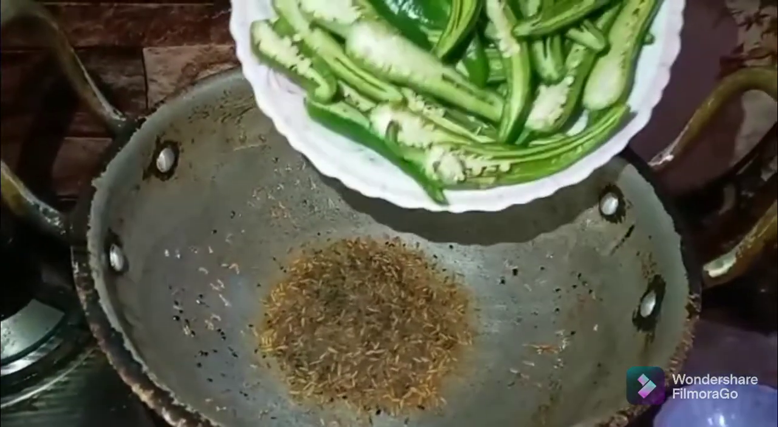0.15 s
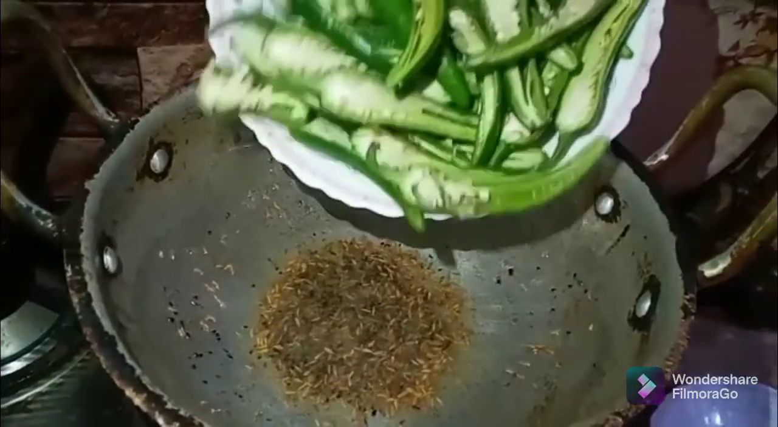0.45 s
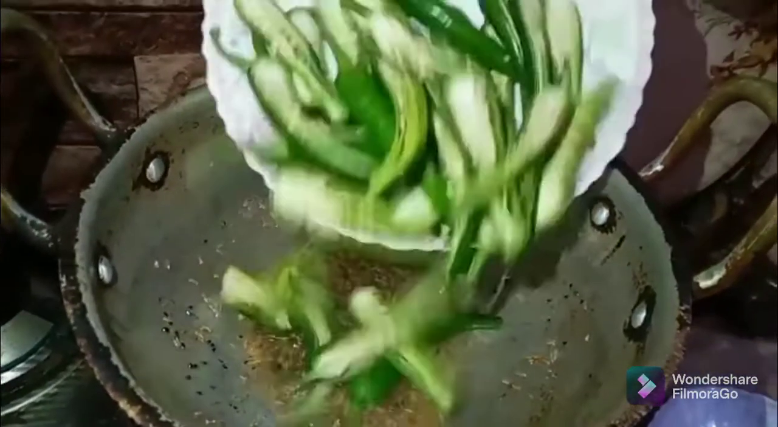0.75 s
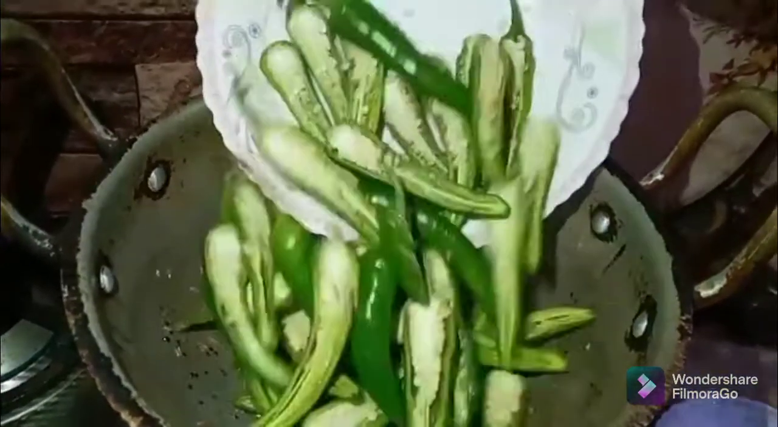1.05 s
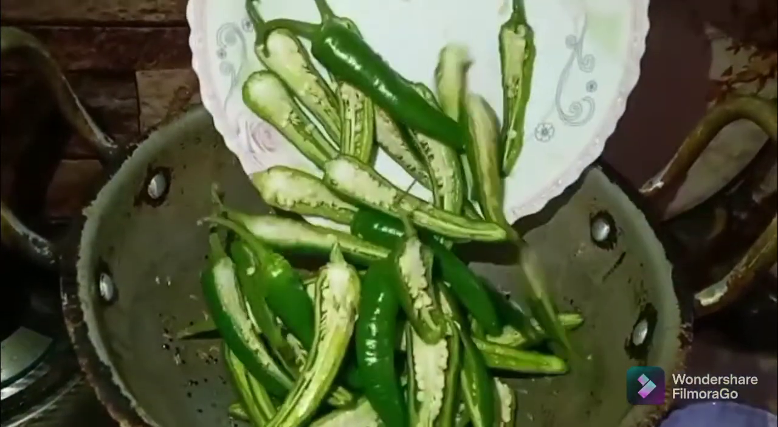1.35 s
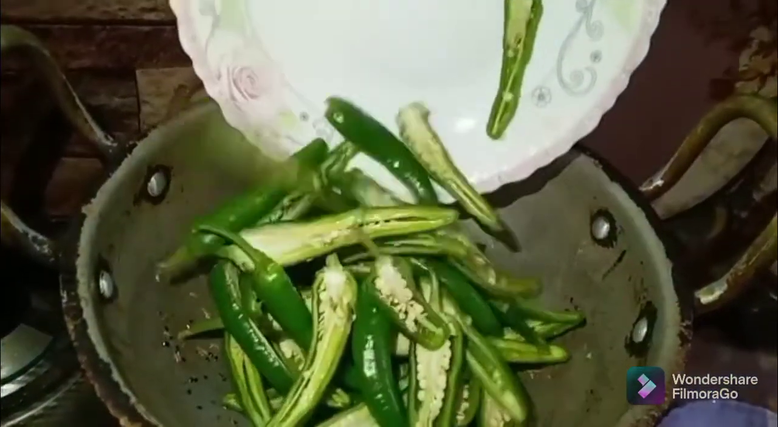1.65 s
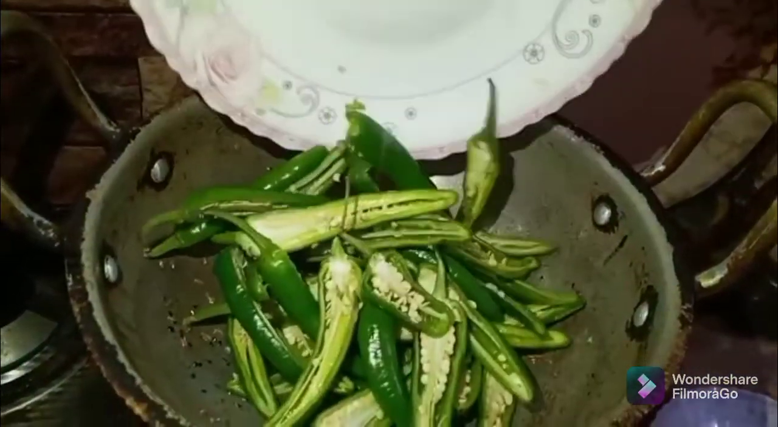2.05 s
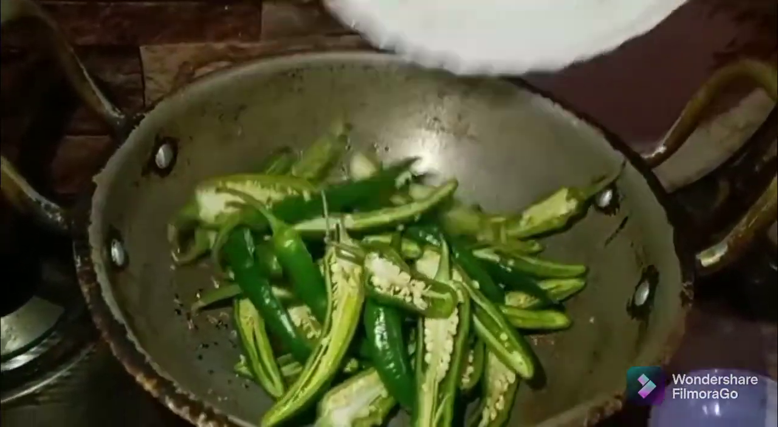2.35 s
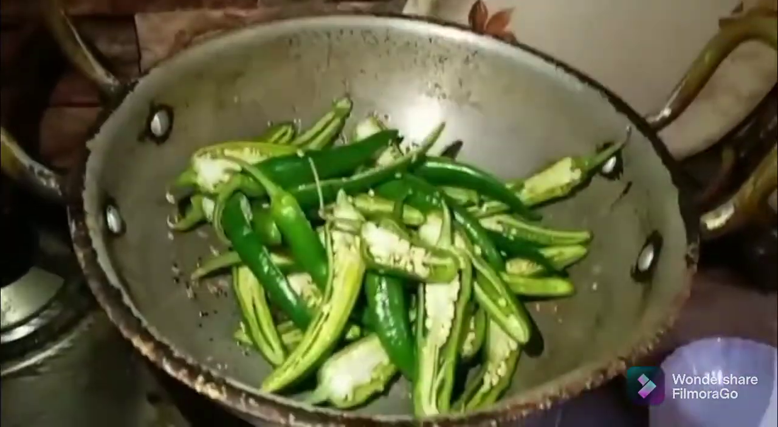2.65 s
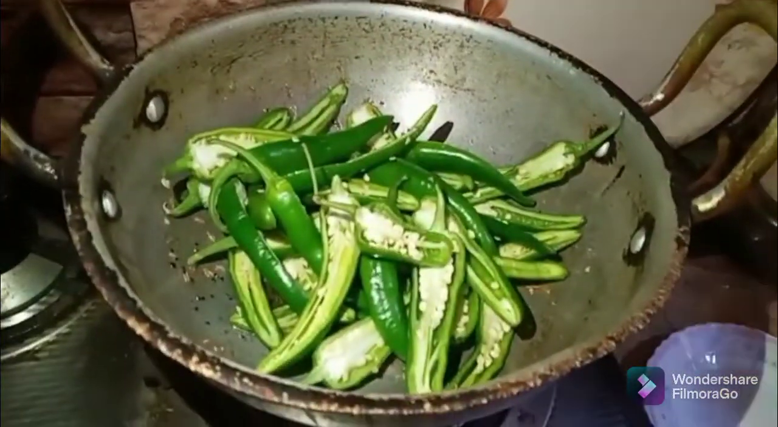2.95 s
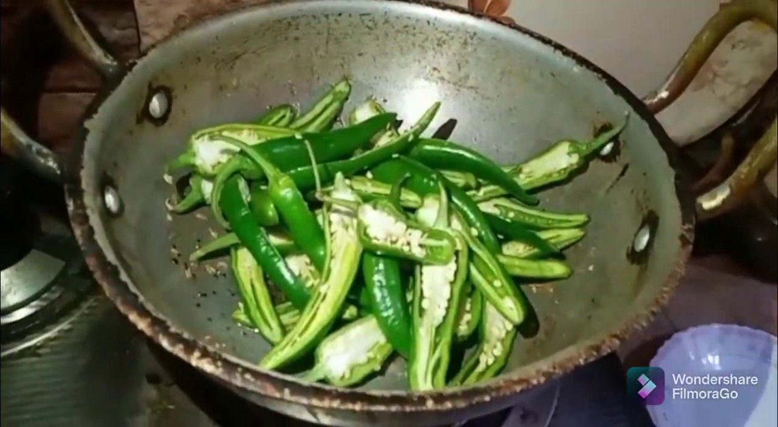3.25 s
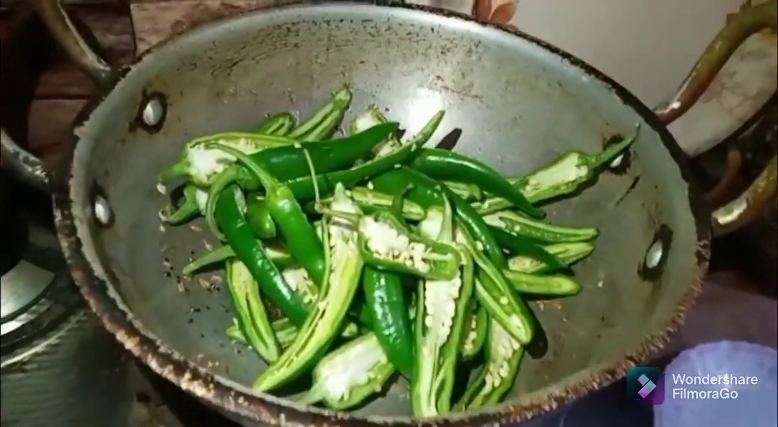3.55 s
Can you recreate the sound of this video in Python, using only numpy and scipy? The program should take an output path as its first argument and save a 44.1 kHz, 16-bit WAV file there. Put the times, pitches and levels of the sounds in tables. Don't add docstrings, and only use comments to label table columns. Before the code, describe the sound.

Frying sizzle bursts up as wet chillies hit hot oil, with sharp pops and a late dish rattle.

```python
import sys
import numpy as np
from scipy import signal
from scipy.fft import rfft, irfft
from scipy.io import wavfile

SR = 44100
rng = np.random.default_rng(int(sys.argv[2]) if len(sys.argv) > 2 else 0)


def store_wav(level_fs):
    pcm = np.round(np.clip(np.atleast_2d(level_fs), -1, 1) * 32767)
    wavfile.write(sys.argv[1], SR, pcm.T.astype(np.int16))


def boost_factor(decibels):
    exponent = np.asarray(decibels, float) / 20
    return 10 ** exponent


N = 163170
LAG_S, LAG_SPREAD_S = 0.0010425, 0.0003


def rms_one(x):
    return x / np.sqrt(np.mean(x ** 2) + 1e-20)


def drift(rate_hz):
    r = np.exp(-16 * np.pi * rate_hz / SR)
    noise = rng.standard_normal(N // 8 + 4002)
    slow = signal.lfilter([1], [1, -2 * r, r * r], noise)[4000:]
    return np.interp(np.arange(N) / 8, np.arange(len(slow)), rms_one(slow))


def colour(x, points):
    hz, db = np.transpose(points)
    size = 4096
    bins_hz = np.arange(size // 2 + 1) * SR / size
    log_gain = np.interp(np.log(bins_hz + 1), np.log(hz), db) * np.log(10) / 20
    cepstrum = irfft(log_gain)
    cepstrum[1:size // 2] *= 2
    cepstrum[size // 2 + 1:] = 0
    impulse = irfft(np.exp(rfft(cepstrum)))[:size // 2]
    return signal.oaconvolve(x, impulse)[:N]


def bandpass(x, order, band_hz):
    return signal.sosfilt(signal.butter(order, band_hz, "band", fs=SR, output="sos"), x)


def thin(x):
    return signal.sosfilt(signal.butter(4, 760, "high", fs=SR, output="sos"), x)


def ring(clicks, hz, t60_s):
    r, w = boost_factor(-60 / (t60_s * SR)), 2 * np.pi * hz / SR
    return signal.lfilter([0, np.sin(w)], [1, -2 * r * np.cos(w), r * r], clicks + 1e-18)


def pan(db):
    return boost_factor([[db / 2], [-db / 2]])


def add(out, start_s, wave, pan_db, lag_s):
    wave = wave * np.ones((2, 1)) * pan(pan_db)
    for side, late_s in enumerate((lag_s, 0)):
        i = int((start_s + late_s) * SR)
        out[side, i:i + wave.shape[1]] += wave[side][:max(N - i, 0)]


# frequency in Hz, gain in dB.
LEFT_MIC = [(550, -29.5), (860, -11.5), (1600, -10), (2500, -2.5), (4800, -2.5), (6500, 3.5), (8800, -12),
            (13000, -25.5), (15200, -9)]
RIGHT_MIC = [(550, -28.5), (860, -7), (1100, -16.5), (2400, -6.5), (6800, -7.5), (8000, -20.5), (11300, -7),
             (13600, -16), (15000, -10)]


def microphones(x):
    return np.array([colour(x[0], LEFT_MIC), colour(x[1], RIGHT_MIC)])


def wok(x):
    echo_db, t60_s = -5, 0.02
    t = np.arange(int(.06 * SR)) / SR
    tail = rng.standard_normal((2, len(t))) * boost_factor(-60 * t / t60_s) * (t > .0006)
    tail *= boost_factor(echo_db) / np.sqrt(np.sum(tail ** 2, axis=1, keepdims=True))
    return x + signal.oaconvolve(x, tail, axes=1)[:, :N]


LOW_PAN_DB = 3.5
LOW_ROOM_HZ, HIGH_ROOM_HZ = 92.9, 138.4
# start in seconds, length in seconds, level in dB.
THUDS_LOW = [(0.175, 0.051, -44.5), (.72, .09, -56.5), (1.501, 0.086, -52), (1.64, 0.057, -55),
             (2.011, 0.055, -54.5), (2.64, 0.051, -55), (3.24, 0.056, -49.5), (0.388, 0.078, -41.5),
             (0.504, 0.082, -43.5), (0.964, 0.022, -46), (1.108, 0.034, -49), (1.384, 0.033, -47),
             (3.362, 0.04, -46), (3.469, 0.045, -45)]
THUDS_HIGH = [(0.009, 0.025, -45.5), (0.105, 0.038, -47.5), (1.113, 0.11, -46), (1.336, 0.073, -46),
              (2.02, 0.067, -55), (2.75, .06, -54), (2.94, 0.068, -54), (2.301, 0.057, -48),
              (2.442, 0.073, -48), (3.496, 0.07, -46)]
# start in seconds, length in seconds, level
# in dB, frequency in Hz.
PLATE_TAPS = [(.768, 0.0034, -41.5, 371), (0.795, 0.012, -40, 400), (3.26, .02, -51, 262),
              (3.47, 0.017, -49.5, 262), (1.05, 0.11, -46, 68.2)]


def thuds():
    out = np.zeros((2, N))
    rows = [(*row, LOW_ROOM_HZ) for row in THUDS_LOW]
    rows += [(*row, HIGH_ROOM_HZ) for row in THUDS_HIGH]
    for start_s, length_s, db, hz in rows + PLATE_TAPS:
        t = np.arange(int((1.18 * length_s + 0.025) * SR)) / SR
        swell = abs(np.sin(np.pi * t / t[-1])) ** 0.92
        wobble = 0.57 * np.sin(50 * t + 99 * start_s)
        wave = np.sin(2 * np.pi * hz * t + wobble) * swell
        add(out, max(start_s - .02, 0), boost_factor(db + 2) * wave, LOW_PAN_DB, LAG_S)
    return out


# frequency in Hz, gain in dB.
AIR = [(30, -19), (65, -9), (93, 3), (140, -5), (240, -17.5), (370, -12), (520, -25.5), (1500, -24)]
# frequency in Hz, width in Hz, level in dB.
WHISTLES = [(4030, 93, -86), (5400, 170, -69), (6600, 400, -67), (6570, 2900, -58.5), (11700, 4700, -64.5)]
AIR_DB = -56.5
FLARE_S, FLARE_WIDTH_S, FLARE_DB = 0.243, 0.014, 8.3


def air_and_gas():
    t = np.arange(N) / SR
    shared, own = rng.standard_normal(N + 99), rng.standard_normal((2, N))
    air = []
    for late, noise in zip((int(LAG_S * SR), 0), own):
        air.append(colour(shared[99 - late:][:N] + 0.57 * noise, AIR + [(9000, -37)]))
    air = rms_one(np.array(air)) * boost_factor(AIR_DB - 2.5 + 2.4 * drift(9.2) + 6.9 * np.exp(-t))
    gas = 0
    for hz, width_hz, db in WHISTLES:
        t60_s = 2.9 / width_hz
        gas = gas + boost_factor(db) * rms_one(ring(ring(own, hz, t60_s), hz, t60_s))
    flare_db = FLARE_DB * np.exp(-((t - FLARE_S) / FLARE_WIDTH_S) ** 2)
    gas = gas * boost_factor(1.6 * drift(8) + flare_db) * [[2], [.5]]
    return (air + gas) * pan(LOW_PAN_DB)


# time in seconds, peak in dB.
KNOCKS = [(3.219, -8), (3.267, -16.5), (3.292, -11), (3.321, -16), (3.416, -6.5), (3.477, -21),
          (3.504, -21)]
# frequency in Hz, level in dB, t60 in seconds.
RIM_A = [(1270, -6, 0.038), (1531, -5, 0.045), (1850, -11, 0.049), (2300, -10, 0.049), (2344, -11, 0.08),
         (4052, -5, 0.058), (6595, -2, .1), (7700, -15, .04)]
RIM_B = [(1330, -11.5, .035), (2420, 1, 0.087), (4157, -13, 0.04), (6840, -13, 0.046), (7680, -10, 0.04)]
# frequency in Hz, gain in dB.
DRAG_COLOUR = [(152, -9), (265, -9), (422, -4), (902, 5), (1302, 11), (1800, 11), (2300, 7), (3502, -16.5)]
DRAG_START_S, DRAG_END_S, DRAG_FADE_S, DRAG_DB = 3.214, 3.62, 0.015, -28.5
TIP_S = 3.37
CONTACT_S, SING_DB = 0.0021, -55.5
DISH_PAN_DB, DISH_LAG_S = 8.5, 0.0005


def dish():
    out, t = np.zeros((2, N)), np.arange(N) / SR
    knock_s, knock_db = np.transpose(KNOCKS)
    fade = np.clip(np.minimum(t - DRAG_START_S, DRAG_END_S - t) / DRAG_FADE_S, 0, 1)
    grit = rng.standard_normal((2, N)) * boost_factor(2.63 * drift(35)) * fade
    grit *= boost_factor(-11 * np.abs(t - DRAG_START_S))
    contact = rng.standard_normal(400) * np.exp(-t[:400] / CONTACT_S)
    share_b = np.where(t < TIP_S, .1, .9)
    for rim, weight in ((RIM_A, 1 - share_b), (RIM_B, share_b)):
        for hz, level_db, t60_s in rim:
            clicks = np.zeros((2, N))
            for side, late_s in enumerate((DISH_LAG_S, 0)):
                at = ((knock_s + late_s) * SR).astype(int)
                clicks[side, at] = boost_factor(knock_db - 6.0 + rng.normal(0, 2.2, len(at)))
            gain_at_mode = abs(np.sum(contact * np.exp(2j * np.pi * hz * t[:400])))
            push = signal.lfilter(contact / gain_at_mode, 1, clicks)
            out += ring(weight * boost_factor(level_db) * (push + boost_factor(SING_DB) * grit[0]), hz, t60_s)
    drag = rms_one(np.array([colour(g, DRAG_COLOUR) for g in grit]))
    return (wok(thin(out)) + boost_factor(DRAG_DB - 13) * drag) * pan(DISH_PAN_DB)


SPARK_DB, CRACK_DB, CRACK_T60_S = 5.5, 0.5, 0.022
# time in seconds, peak in dB.
CRACKS = [(0.5055, -25.5), (0.643, -19.5), (0.6717, -26), (0.7673, -21), (0.9616, -27), (1.0079, -21.5),
          (1.0528, -22), (1.2784, -22), (2.6622, -23.5), (2.702, -23), (3.3468, -19.5)]


def cracks():
    out, t = np.zeros((2, N)), np.arange(int(.06 * SR)) / SR
    front = 1 + 4.2 * (t < .0002)
    for start_s, db in CRACKS:
        noise = np.diff(rng.standard_normal((2, len(t))), prepend=0) * 0.63
        fall = boost_factor(db + CRACK_DB - 60 * t / CRACK_T60_S)
        add(out, start_s, fall * noise * front, 0, LAG_S)
    return microphones(out) * boost_factor(SPARK_DB)


# time in seconds, peak in dB, pitch in Hz.
BUBBLE_POPS = [(0.643, -23.5, 6300), (0.71, -11.5, 4030), (0.766, -13.5, 6900), (0.825, -13.5, 2140),
               (1.042, -23, 5640), (1.053, -15.5, 5440), (1.116, -15, 6000), (1.193, -11, 5630),
               (1.24, -7.5, 2080), (1.312, -19, 6600), (1.33, -12, 6600), (1.387, -14.5, 6500),
               (1.425, -11, 6400), (1.455, -11, 6260), (1.503, -22, 5450), (1.517, -10, 5240),
               (1.598, -9, 6300), (1.645, -11.5, 6070), (1.668, -11, 6000), (1.703, -10.5, 5650),
               (1.743, -15.5, 3560), (1.799, -15, 3650),
               (0.416, -26, 6600), (0.472, -22, 6300), (1.084, -12, 2320), (1.576, -16, 1200),
             (1.963, -11.5, 3900), (1.999, -10, 3550), (2.043, -10, 5590), (2.077, -12, 2600),
             (2.148, -12, 3800), (2.241, -11.5, 3580), (2.276, -12.5, 5930), (2.416, -11, 4660),
             (2.457, -9, 2450), (2.506, -10, 4400), (2.556, -13.5, 6840), (2.594, -16, 3400),
             (2.737, -13, 3130), (2.863, -8.5, 5800), (3.347, -18, 6640), (3.507, -11.5, 6500),
             (3.53, -9, 3420), (3.64, -9.5, 2570), (1.587, -13, 2400), (1.128, -15, 3600),
             (1.255, -13, 2170), (1.346, -18, 1500), (1.388, -15, 2600), (1.537, -18, 1500),
               (0.5338, -17.5, 5370), (0.611, -18, 6730), (0.7883, -16.5, 6600), (0.8996, -19, 6950),
              (0.945, -22, 2900), (1.0724, -17.5, 2360), (1.1665, -14.5, 6270), (1.3464, -20.5, 6550),
              (1.5364, -19, 6440), (1.7544, -15, 3780), (1.7674, -15.5, 5850), (1.8317, -17, 6380),
              (1.8427, -16, 5800), (1.9044, -20, 6680), (1.9455, -14, 6140), (1.9774, -14, 6210),
              (2.069, -13.5, 2580), (2.1031, -15.5, 3760), (2.1594, -14.5, 4190), (2.1824, -17, 2530),
              (2.2164, -13, 6480), (2.3147, -14.5, 6280), (2.3466, -16, 6700), (2.3595, -14.5, 4300),
              (2.39, -14, 6110), (2.6633, -15, 5400), (2.6764, -18.5, 6700), (2.7058, -17.5, 6380),
              (2.798, -13.5, 5170), (2.8446, -13.5, 4200), (2.8774, -14.5, 6720), (2.8887, -15, 3600),
              (2.907, -14, 6600), (3.025, -16.5, 6190), (3.0485, -11.5, 6760), (3.0829, -18, 3230),
              (3.0983, -13, 4120), (3.126, -16, 3050), (3.1787, -14.5, 6370), (3.1984, -9, 6460),
              (3.5444, -10.5, 4360), (3.5745, -13.5, 5680), (3.625, -13.5, 2770)]
POPS = BUBBLE_POPS
POP_DB, POP_CYCLES, POP_PAN_DB = -1, 26, 5.5
SECOND_DB, SECOND_S = -7, 0.0042
PUFF_DB, PUFF_T60_S = -17, 0.04


def pops():
    out, sparks = np.zeros((2, N)), np.zeros((2, N))
    t = np.arange(int(.06 * SR)) / SR
    for start_s, db, hz in POPS:
        a, b, c = rng.standard_normal(3)
        noise = rng.standard_normal((2, len(t)))
        turns = hz * t
        t60_cycles = POP_CYCLES * (hz / 6000) ** 0.97 * boost_factor(1.5 * a)
        wave = np.sin(2 * np.pi * turns * (1 + 0.0011 * turns))
        wave *= (1 - np.exp(-turns)) * boost_factor(-60 * turns / t60_cycles)
        wave *= boost_factor(db + POP_DB - 4.0 * (hz < 3000)) / abs(wave).max()
        add(out, start_s, wave, POP_PAN_DB, LAG_S + LAG_SPREAD_S * b)
        second_s = start_s + SECOND_S * boost_factor(2.6 * c)
        add(out, second_s, boost_factor(SECOND_DB) * wave, POP_PAN_DB, LAG_S - LAG_SPREAD_S * b)
        puff = rms_one(bandpass(noise, 3, [hz / 1.59, hz * 0.99 + 1200]))
        add(out, start_s, puff * boost_factor(db + PUFF_DB - 60 * t / PUFF_T60_S), POP_PAN_DB, LAG_S)
        spark = boost_factor(db + PUFF_DB - 60 * t / CRACK_T60_S) * noise * 0.82
        add(sparks, start_s, spark, 0, LAG_S)
    return thin(out) + microphones(sparks) * boost_factor(SPARK_DB)


WOK_HZ, WOK_RING_T60_S, WOK_RING_DB, THUMP_DB = 874, 0.064, -36, -6
# time in seconds, peak in dB.
THUMPS = [(0.475, -34.5), (0.825, -38), (1.084, -37), (1.136, -30), (1.537, -32), (1.577, -23),
          (1.869, -36), (1.904, -33), (1.956, -32), (2.443, -31.5), (2.806, -29), (2.979, -31.5),
          (3.007, -29.5)]


def bowl():
    clicks = np.zeros((2, N))
    for start_s, db, hz in POPS:
        add(clicks, start_s, boost_factor(db + WOK_RING_DB - 9.5 * np.log2(hz / 3000)) * np.ones(1), 0, LAG_S)
    for start_s, db in THUMPS:
        add(clicks, start_s, boost_factor(db + THUMP_DB) * np.ones(1), 0, LAG_S)
    return ring(clicks, WOK_HZ, WOK_RING_T60_S)


def scatter(per_s, spread_db):
    at = np.flatnonzero(rng.random(N) < per_s / SR)
    size, sign, place, lag, pitch = rng.random((5, len(at)))
    height = boost_factor(spread_db * np.minimum(-np.log(size + 1e-9), 2.4)) * np.sign(sign - .5)
    lag_s = LAG_S + LAG_SPREAD_S * (4 * lag - 2)
    late = np.clip(at + (lag_s * SR).astype(int), 0, N - 1)
    return (late, at), height * boost_factor(np.outer([1, -1], 8 * (place - .5))), pitch


FIZZ_DB, FIZZ_PATCHY_DB = -3.5, 3


def fizz(flurry, wet_db):
    edges_hz = np.geomspace(400, 17000, 14)
    white, out = rng.standard_normal((2, 2, N)), 0
    for k, (low_hz, high_hz) in enumerate(zip(edges_hz, edges_hz[1:])):
        gain_db = FIZZ_PATCHY_DB * (0.27 * flurry + .5 * drift(3.8) + drift(28))
        gain_db += 2 * wet_db * (low_hz > 7000)
        gain_db -= (4 + 2 * wet_db) * (low_hz < 2200)
        out = out + boost_factor(gain_db) * bandpass(white[k % 2], 2, (low_hz, high_hz))
    return boost_factor(FIZZ_DB) * rms_one(out)


SPIT_PER_S, SPIT_DB = 810, -11


def spit(flurry, wet_db):
    out = np.zeros((2, N))
    at, height, _ = scatter(SPIT_PER_S * boost_factor(2.7 * flurry), spread_db=6.0)
    for side in (0, 1):
        out[side, at[side]] = height[side] * boost_factor(wet_db[at[side]])
    return boost_factor(SPIT_DB) * rms_one(out)


BUBBLES_PER_S, BUBBLE_DB, BUBBLE_SPREAD_DB, BUBBLE_CYCLES = 400, -6, 3.5, 8.1


def chance_bubbles(flurry):
    at, height, pitch = scatter(BUBBLES_PER_S * boost_factor(4 * flurry), BUBBLE_SPREAD_DB)
    pitches_hz, out = np.geomspace(800, 13000, 18), 0
    for k, hz in enumerate(pitches_hz):
        mine = (pitch * len(pitches_hz)).astype(int) == k
        clicks = np.zeros((2, N))
        for side in (0, 1):
            clicks[side, at[side][mine]] = height[side, mine] * (hz / 4000) ** 0.82
        out = out + ring(clicks, hz, BUBBLE_CYCLES / hz)
    return boost_factor(BUBBLE_DB) * rms_one(out)


WET_DB, WET_S = 8.5, 0.49
# time in seconds, level in dB.
FRYING_LEVEL = [(0, -66), (.41, -61), (0.419, -44.5), (.464, -60), (0.471, -38), (.6, -35.5), (.635, -48),
                (.65, -33), (.95, -38), (1.24, -31.5), (1.295, -39), (1.32, -30.5), (2.2, -31), (3.1, -29.5),
                (3.25, -33.5), (3.7, -29.5)]


def frying():
    t = np.arange(N) / SR
    flurry, wet_db = drift(9), WET_DB * np.exp(-t / WET_S)
    oil = fizz(flurry, wet_db) + wok(spit(flurry, wet_db) + chance_bubbles(flurry))
    frying_s, frying_db = np.transpose(FRYING_LEVEL)
    return microphones(oil) * boost_factor(np.interp(t, frying_s, frying_db) + 9)


def scene():
    kitchen = thuds() + air_and_gas()
    bursts = wok(cracks() + pops() + bowl())
    return kitchen + dish() + bursts + frying()


def top_cut(x):
    return signal.sosfilt(signal.butter(12, 17020, fs=SR, output="sos"), x)


def record(dry):
    low = signal.sosfilt(signal.cheby2(14, 40, 16050, fs=SR, output="sos"), dry)
    return top_cut(np.tanh(low / 1.107) * 1.527)


dry = scene()
out = record(dry)
store_wav(out)
```